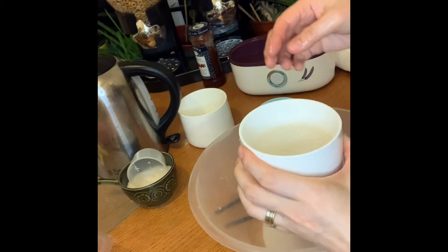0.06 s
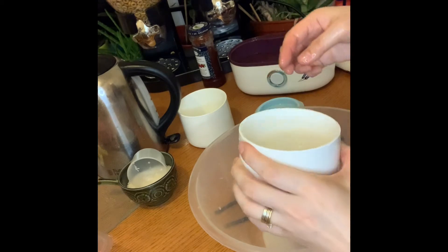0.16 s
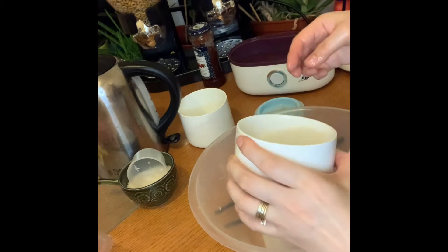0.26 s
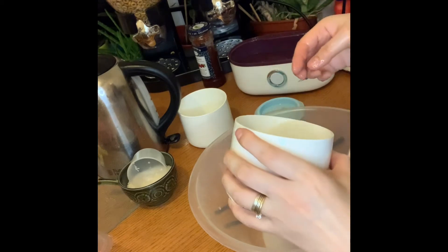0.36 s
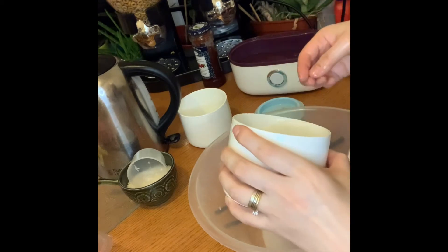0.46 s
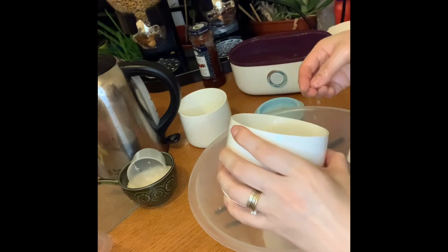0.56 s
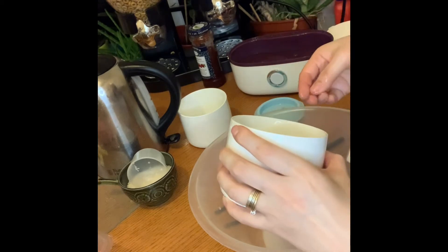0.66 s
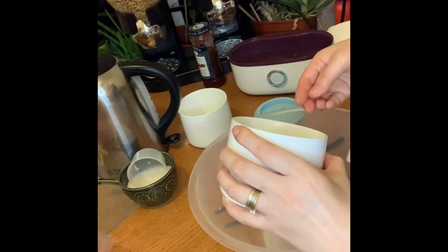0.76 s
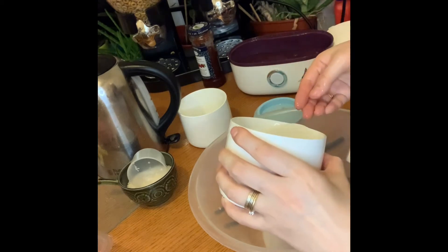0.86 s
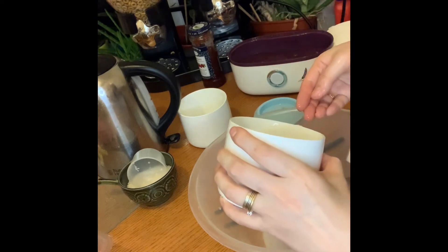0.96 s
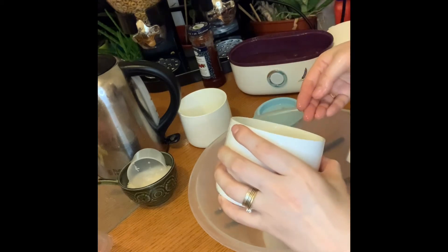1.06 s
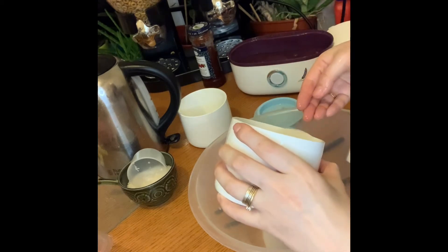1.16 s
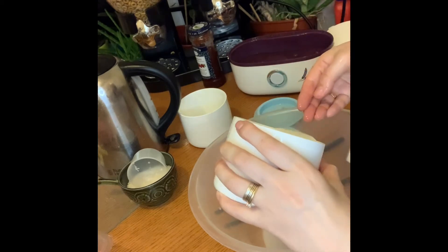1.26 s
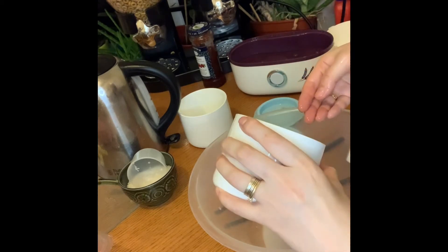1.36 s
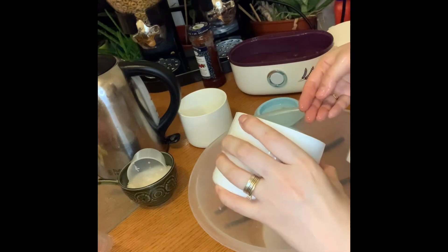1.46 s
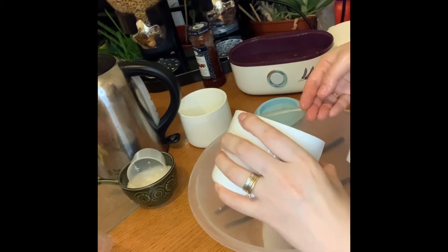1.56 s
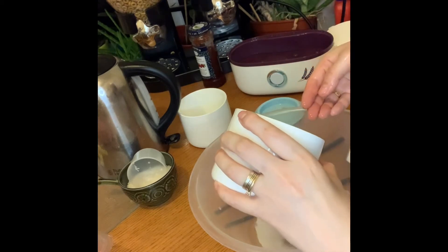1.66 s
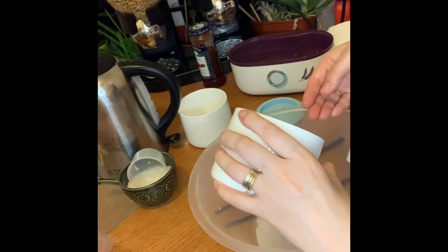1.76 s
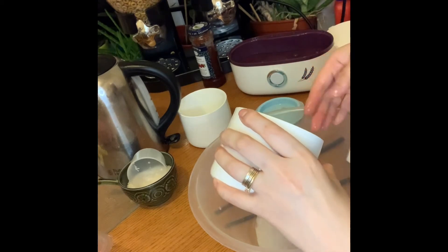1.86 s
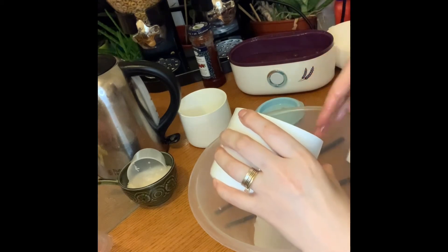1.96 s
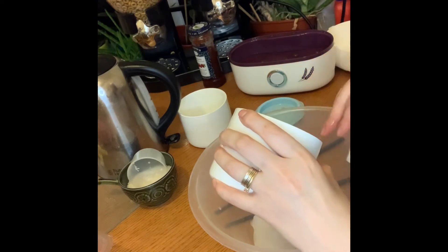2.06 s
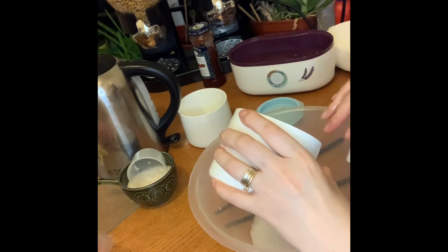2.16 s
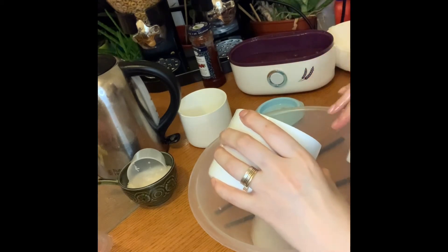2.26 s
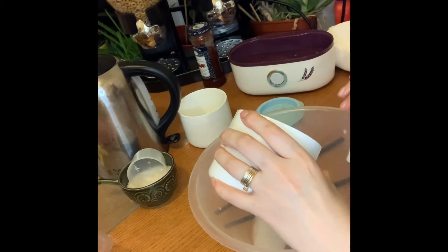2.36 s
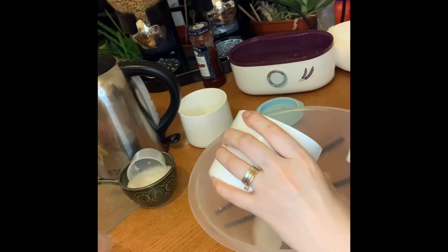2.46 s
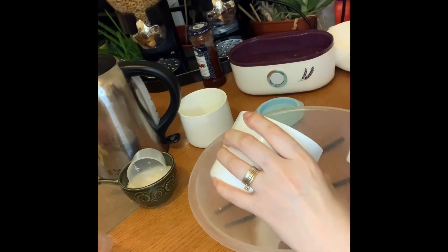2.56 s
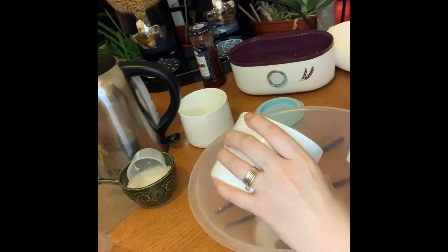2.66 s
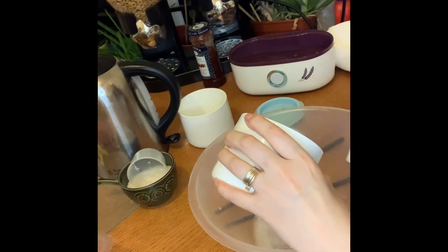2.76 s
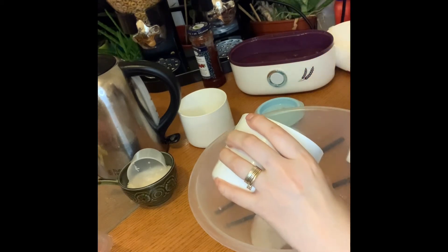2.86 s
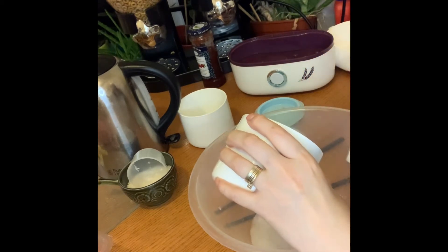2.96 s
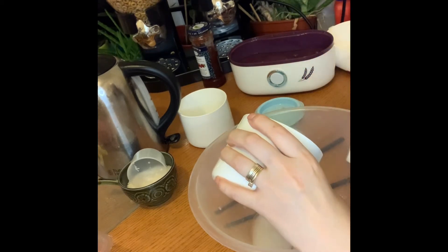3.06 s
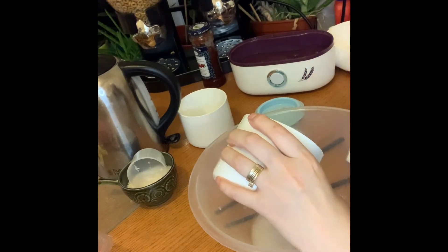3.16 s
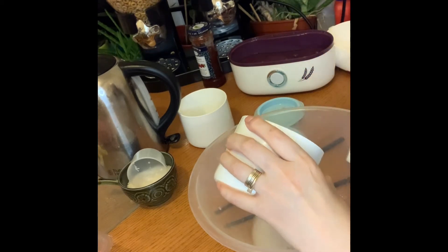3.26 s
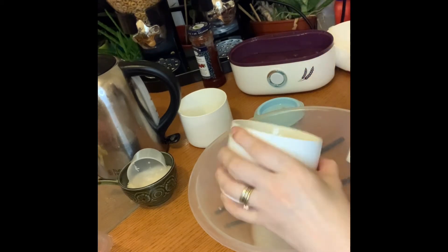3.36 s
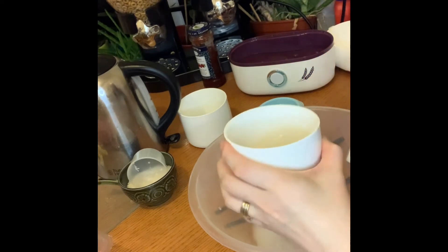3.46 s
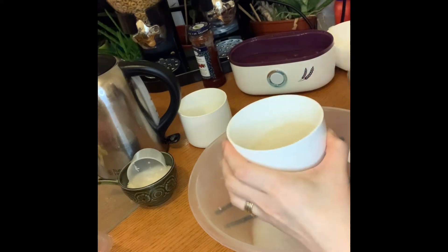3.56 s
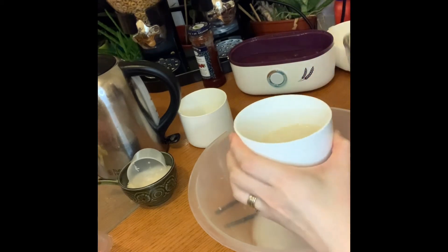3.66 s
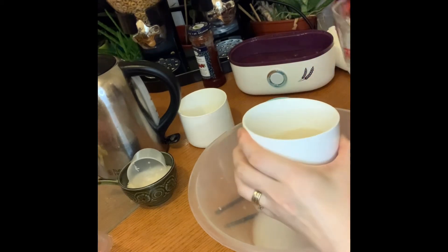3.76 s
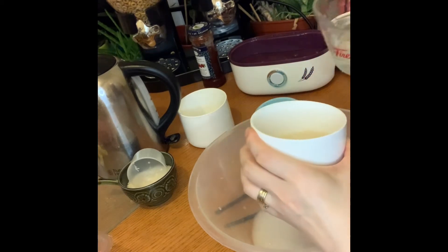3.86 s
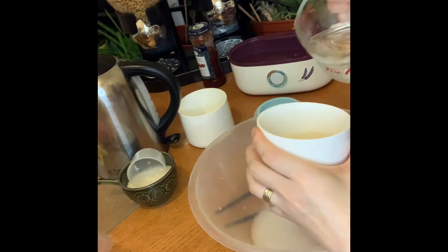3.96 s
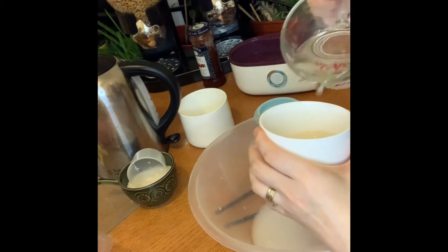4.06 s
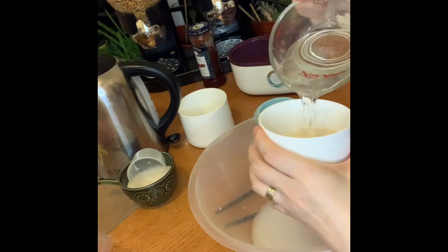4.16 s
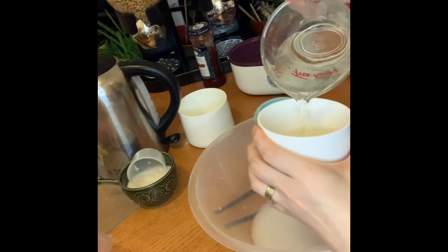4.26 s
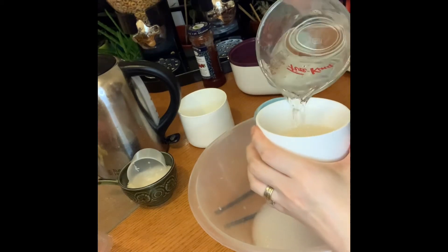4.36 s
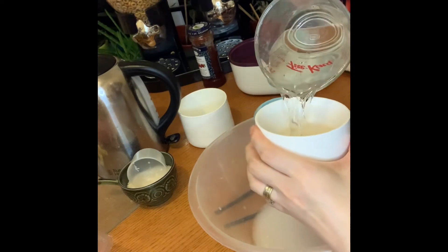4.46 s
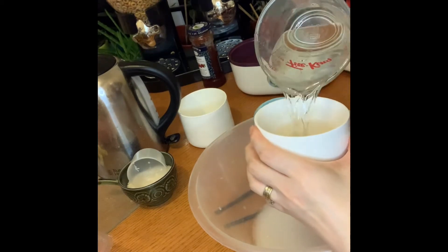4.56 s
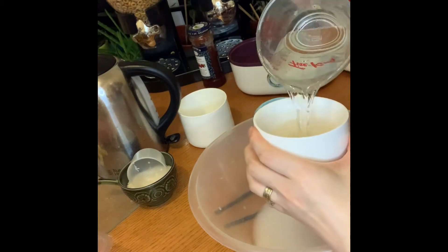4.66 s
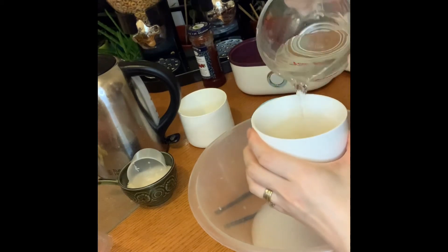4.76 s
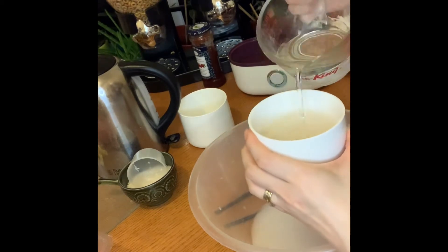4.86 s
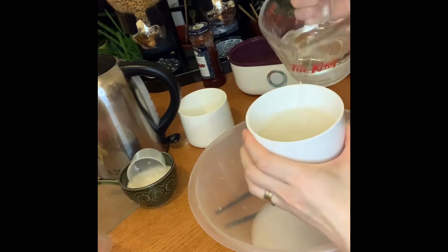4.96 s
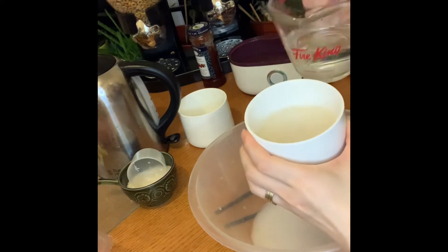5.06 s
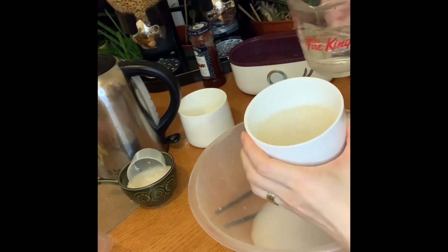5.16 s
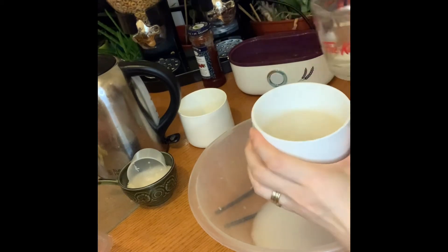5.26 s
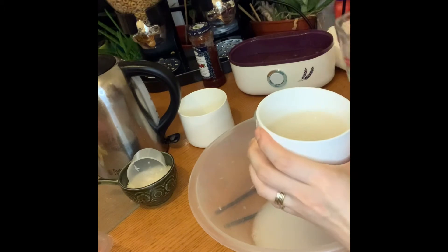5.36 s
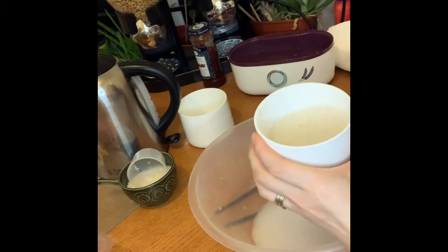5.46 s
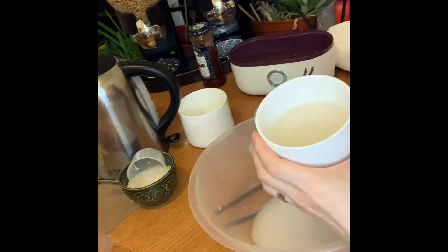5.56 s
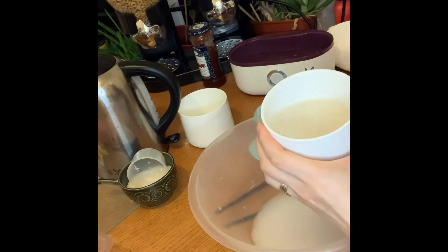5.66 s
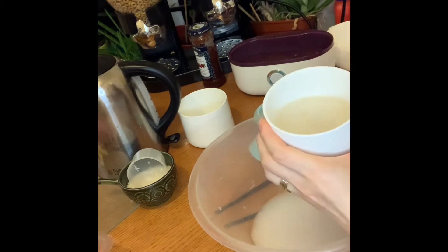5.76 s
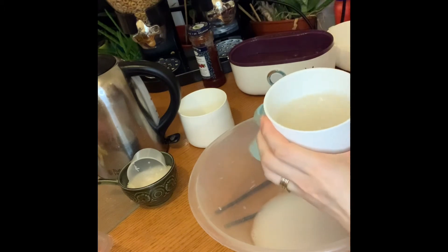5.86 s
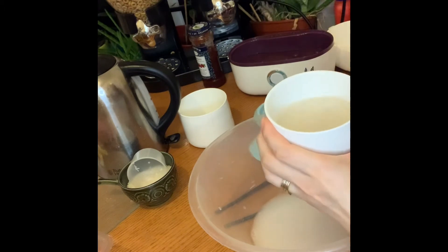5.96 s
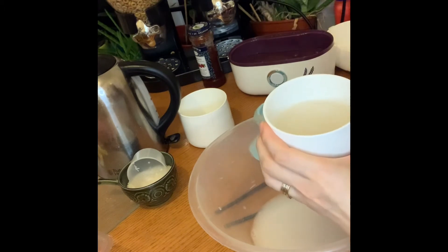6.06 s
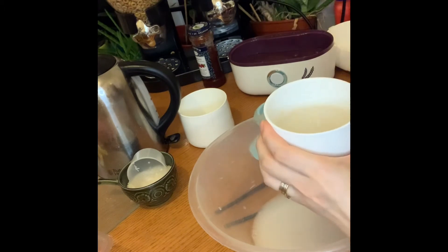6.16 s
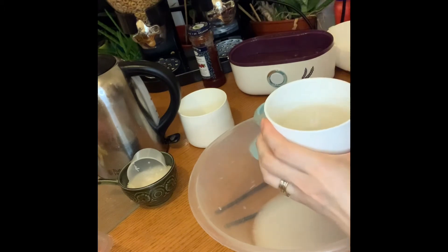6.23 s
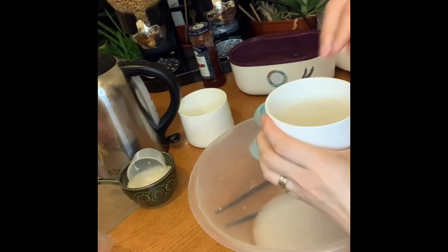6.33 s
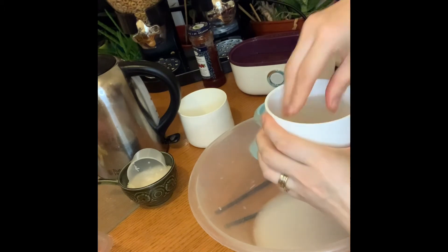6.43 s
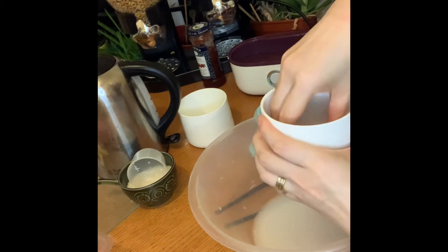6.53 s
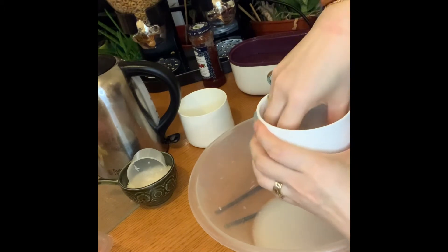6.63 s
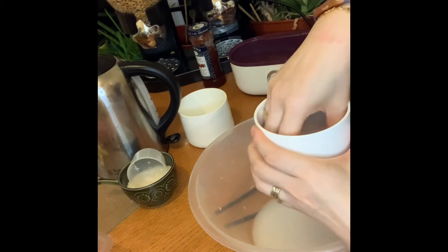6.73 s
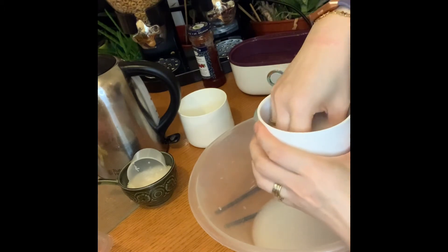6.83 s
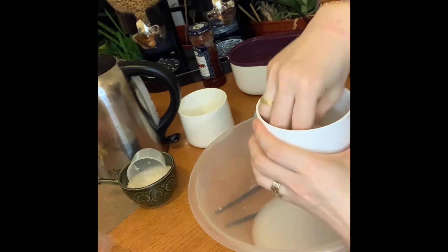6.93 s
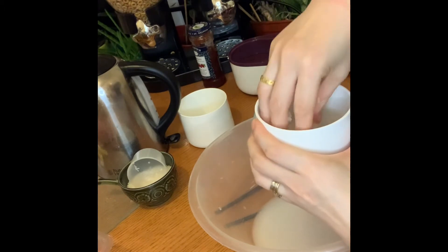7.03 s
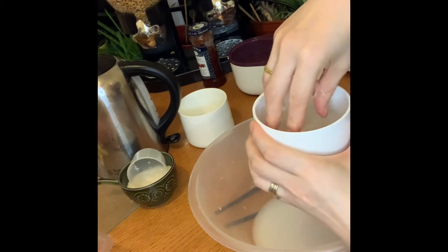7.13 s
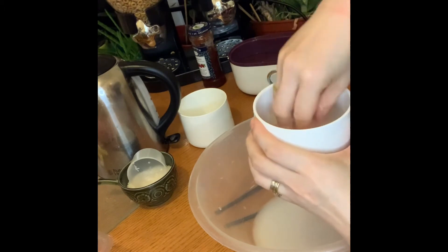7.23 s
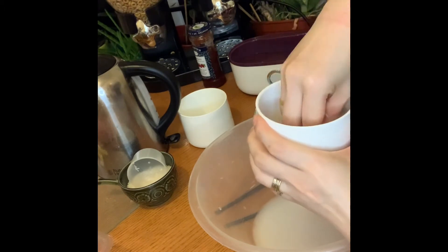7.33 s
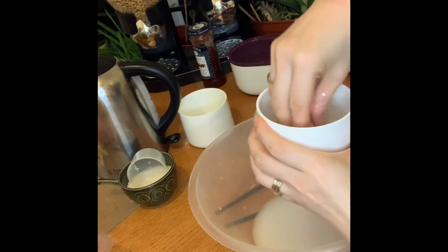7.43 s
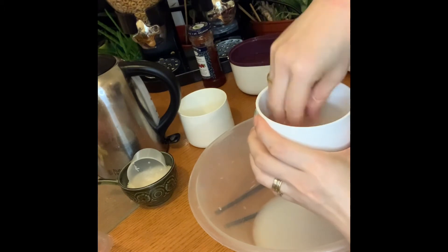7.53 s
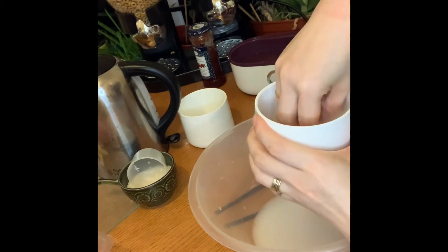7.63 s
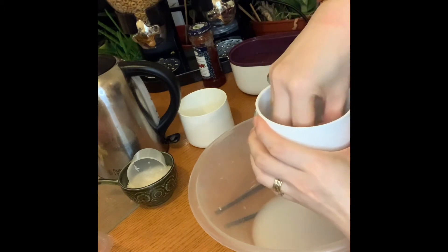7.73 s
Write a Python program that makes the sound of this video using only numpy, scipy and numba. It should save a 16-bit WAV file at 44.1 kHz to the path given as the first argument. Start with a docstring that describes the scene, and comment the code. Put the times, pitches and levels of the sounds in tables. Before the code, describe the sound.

Close up, water runs unevenly out of a ceramic pot of rice and patters into a plastic bowl with small gurgles and splashes. After a brief lull, a glass jug splashes a little water into the pot, then lands on the wooden table with a sharp knock, the loudest sound, followed by smaller taps. Quiet sloshing follows as a hand stirs the rice. A low fridge hum sits underneath in the small kitchen.

```python
"""Rinse water runs from a ceramic pot into a plastic bowl: bubbles chirp, spray crackles, the bowl rings.
A glass jug refills the pot and is set down hard, ringing a wooden table; then fingers stir the rice.
A fridge hums in the small kitchen. A phone with two microphone ports stands close by:
left lags right, the treble is nearly the same in both."""
import sys
import numpy as np
from scipy import signal
from scipy.fft import rfft, irfft, next_fast_len
from scipy.io import wavfile
from scipy.ndimage import uniform_filter1d, minimum_filter1d
from numba import njit

SR = 44100
rng = np.random.default_rng(int(sys.argv[2]) if len(sys.argv) > 2 else 0)


def to_wav(s):
    """Save 16-bit WAV."""
    ch = np.atleast_2d(s).T  # columns
    pcm = np.round(np.clip(ch, -1, 1) * 32767)  # PCM
    wavfile.write(sys.argv[1], SR, pcm.astype(np.int16))


N = 343539

# compressor hum (time [s], level [dB])
HUM = [(0.0, -47.5), (1.82, -47), (5.68, -48), (5.88, -46.5), (6.25, -48.5), (7.01, -48), (7.79, -49)]
# faint fridge tones (multiple of rotor speed, level [dB])
HUM_OVERTONES = [(4, -85), (10.2, -93), (17, -97)]
# steady bass-heavy background noise, its hiss cut off above about 14 kHz (frequency [Hz], gain [dB])
BACKGROUND_SPECTRUM = [(30, 6.5), (70, 9), (130, -0.5), (250, -6), (500, -18.5), (1000, -25.5), (2000, -27),
                       (4000, -28), (8000, -31.5), (12500, -33), (14500, -64)]
# glass on wood (time [s], blow [dB], contact [ms], thud [dB], ring time left under the hand [ratio])
KNOCKS = [(0.001, -72.5, 0.79, -72, 0.95), (0.945, -46.5, 3.26, -66, 0.91), (5.495, -17, 0.74, -15, 1),
          (5.592, -41, 0.7, -34.5, 1), (5.815, -38, 1.17, -42, 0.64), (5.833, -26, 3.9, -54, 0.4),
          (5.964, -75, 0.35, -60, 0.45)]
# table top (frequency [Hz], gain [dB], T60 [s])
TABLE_MODES = [(140.9, 0, 0.22), (192, -8, 0.36), (256.5, 1, .13), (298.7, -6, 0.2), (358.9, -0.5, .2),
               (410, 1.5, 0.11), (447, -4, 0.17), (508, -6.5, 0.18), (596.3, -0.5, .1), (615, 4, 0.13),
               (713.5, 2, 0.11), (815, -1, 0.09), (899, -1, .14), (1160, 1.5, 0.18), (1200, -3.5, .1),
               (1303, -1.5, 0.1), (1642, -5, 0.092), (1976, -2.5, 0.073), (3297, -14.5, 0.2)]
# dense wood response between the modes (frequency [Hz], gain [dB])
THUD_SPECTRUM = [(90, -40), (260, 1.5), (400, 2.5), (650, 0), (1000, -7), (2000, -12.5), (4000, -18.5),
                 (9000, -29.5), (15000, -30.5)]
# pot moved or rice stirred (crest time [s], level [dB], treble share [dB], hold [s])
SLOPS = [(0.02, -96, -11, 0.018), (0.116, -84, 1.5, 0.0062), (1.116, -82.5, -1.5, 0.0077),
         (4.102, -75.5, 12.5, 0.0025), (5.111, -81, -7, .35), (6.12, -81, -3.5, 0.0062),
         (6.337, -86.5, 13, 0.012), (6.614, -65, -4.5, 0.052), (6.788, -83, 3, 0.018),
         (6.861, -89, 10, 0.07), (7.089, -76.5, 4, 0.017), (7.426, -83, 8, 0.0022), (7.566, -97, 27, 0.013),
         (7.78, -84, 6, 0.011)]
# one list a pour: pot to bowl, jug to pot (time [s], flow [dB], treble share [dB])
POURS = [
    [(1.222, -57.5, -30), (1.235, -74.5, -41), (1.29, -64.5, -4.5), (1.37, -63, 1), (1.43, -71.5, -2),
     (1.47, -59, -18), (1.51, -61, 1), (1.62, -60, -6.5), (1.66, -56.5, -7), (1.76, -51, -20),
     (1.84, -61.5, -2.5), (1.9, -63.5, -1.5), (1.95, -56.5, 0), (2.17, -58, -4.5), (2.19, -59, 3),
     (2.27, -62.5, -4), (2.33, -58, -9.5), (2.45, -70, -6), (2.6, -61, -10.5), (2.73, -64, -1),
     (2.8, -67, -5.5), (2.83, -61.5, -1.5), (2.88, -56.5, -0.5), (3.17, -60.5, -4), (3.19, -58.5, 6),
     (3.33, -66.5, -8), (3.5, -89.5, 7), (3.65, -100, 13.5)],
    [(4.24, -109, 20), (4.29, -84, 5.5), (4.55, -81, 3.5), (4.6, -78.5, 7.5), (4.74, -70.5, -6.5),
     (4.76, -66, -5), (4.82, -69.5, 2.5), (4.95, -104, 10)],
]
# hollow of the pot (frequency [Hz], gain [dB])
POT_CAVITY = [(900, -21), (1150, -8), (1320, 1.5), (1500, -1), (1680, 1.5), (1950, -2), (2150, -5),
              (2450, -0.5), (2750, -1), (3050, 1), (3500, 4.5), (3900, -0.5), (6000, -3.5)]
# plastic bowl (frequency [Hz], gain [dB], T60 [s])
BOWL_MODES = [(189, -5, 0.03), (286, -3, 0.045), (399, -4, 0.026), (514, 2.5, 0.046), (567, 7, 0.022),
              (686, 6, 0.0066)]
# single bubbles (time [s], level [dB], pitch [Hz])
BUBBLES = [(1.231, -45, 523), (1.285, -51, 388), (1.321, -42.5, 1570), (1.449, -41, 2240),
           (1.448, -40, 2750), (1.506, -47.5, 464), (1.507, -43, 1115), (1.529, -38, 1570),
           (1.543, -33.5, 1940), (1.646, -56, 538), (1.673, -40.5, 550), (1.696, -32, 550),
           (1.725, -34.5, 542), (1.736, -53, 544), (1.759, -30.5, 544), (1.802, -39, 540),
           (1.915, -43, 1730), (1.939, -48, 533), (1.948, -52, 1415), (1.962, -47, 564), (1.985, -48, 546),
           (2.01, -47, 533), (2.052, -55, 520), (2.076, -31, 3980), (2.076, -42, 1430), (2.077, -46.5, 570),
           (2.106, -40, 1730), (2.149, -39, 1460), (2.172, -66, 563), (2.187, -31.5, 1420),
           (2.205, -47, 555), (2.223, -41, 2610), (2.225, -48, 553), (2.223, -36.5, 1820),
           (2.304, -40, 1455), (2.309, -48, 550), (2.34, -38.5, 537), (2.455, -47, 546), (2.507, -49, 511),
           (2.59, -48, 1310), (2.68, -47, 510), (2.705, -50, 547), (2.727, -43, 1710), (2.81, -35.5, 1630),
           (2.88, -50.5, 520), (2.88, -37.5, 1820), (2.88, -38, 1290), (2.881, -24.5, 3830),
           (2.918, -36, 1464), (2.943, -30.5, 3530), (3.082, -43, 1580), (3.116, -50.5, 510),
           (3.14, -47.5, 3020), (3.186, -41, 2470), (3.209, -36, 2335), (3.212, -50, 517),
           (3.31, -35.5, 1745), (4.099, -45.5, 3500), (4.099, -57.5, 1305), (4.273, -61, 2670),
           (4.312, -56, 2800), (4.36, -55, 2720), (4.439, -60, 2830), (4.521, -52, 2640), (4.56, -53, 1700),
           (4.578, -48, 1620), (4.607, -53, 1380), (4.633, -53, 1360), (4.635, -50, 2810),
           (4.661, -56, 1580), (4.68, -57, 1250), (4.706, -57, 2680), (4.761, -44, 2760),
           (4.759, -35, 1275), (4.762, -46, 2100), (4.779, -42, 1220), (4.81, -53, 1230),
           (4.839, -58, 1230), (6.322, -57.5, 1596), (6.574, -60.5, 2300), (6.605, -49, 2590),
           (6.626, -51.5, 1380), (6.658, -53, 1340), (6.666, -46.5, 3500), (6.7, -61, 1370),
           (6.738, -48, 3520), (6.801, -62, 2770), (6.83, -64, 2700), (6.864, -68, 1480), (6.9, -62, 2750),
           (6.959, -62, 2500), (7.066, -60.5, 2510), (7.082, -53.5, 2350), (7.085, -74, 1450),
           (7.1, -55, 3160), (7.384, -63, 3130), (7.41, -65, 1490), (7.494, -74, 1590), (7.528, -67, 1580),
           (7.564, -66.5, 1520)]
# single splats (time [s], level [dB], pitch [Hz])
SPLATS = [(1.245, -49, 9500), (1.283, -39.5, 8700), (1.484, -50, 8100), (1.572, -45.5, 8450),
          (1.762, -44.5, 7040), (1.805, -38.5, 11800), (1.832, -32, 13100), (1.948, -49, 6550),
          (2.035, -39, 6660), (2.0742, -44, 15400), (2.186, -33.5, 8600), (2.324, -44, 9300),
          (2.391, -44.5, 5400), (2.526, -49, 14400), (2.559, -43, 10100), (2.831, -36.5, 10000),
          (2.973, -39, 9100), (3.0184, -36, 7300), (3.086, -38, 12000), (3.18, -40, 7500),
          (3.2903, -44.5, 10200), (3.7386, -48, 10700), (3.998, -53.5, 8400), (4.077, -48, 15200),
          (4.095, -40, 7200), (4.196, -49.5, 9500), (4.2333, -44.5, 15400), (4.328, -54, 6860),
          (4.475, -56.5, 5800), (4.532, -58, 15000), (4.588, -57, 14700), (4.612, -59, 7760),
          (4.681, -57, 7900), (4.7227, -52, 6500), (4.76, -39, 5270), (4.777, -34.5, 10300),
          (4.807, -34, 10100), (6.3223, -57, 5830), (6.334, -53, 5750), (6.663, -48.5, 6250),
          (6.782, -60, 10200), (6.8623, -73, 7150), (7.0692, -56.5, 8050), (7.3051, -62.5, 8050),
          (7.385, -54, 8610), (7.4043, -53, 7850), (7.581, -56, 6820)]
# kitchen decay (frequency [Hz], T60 [s])
ROOM_T60 = [(100, 0.64), (300, 0.28), (1000, 0.32), (3000, 0.11), (10000, 0.056)]
# port difference: near sound leaning right, echoes, background (frequency [Hz], gain [dB])
NEAR_LEAN = [(100, -40), (300, -17), (600, -9), (1200, -19.5), (2400, -15.5), (4500, -47.5)]
ECHO_WIDTH = [(40, -27.5), (130, -27.5), (300, -10.5), (600, -4), (1200, 0), (2400, 2.5), (4500, -27),
              (7000, -17.5), (9500, -27), (15000, -8.5)]
BACKGROUND_WIDTH = [(40, -30.5), (130, -15.5), (300, -3.5), (600, 11.5), (1200, 6), (2400, -9),
                    (4500, -24.5), (7000, -10.5), (9500, -12.5), (15000, -11.5)]


def undb(db):
    return 10 ** (np.asarray(db) / 20)


def unit_rms(x):
    return x / np.sqrt(np.mean(x ** 2))


def wander(span_samples):
    """Smoothed noise, rms 1."""
    return unit_rms(uniform_filter1d(rng.standard_normal(N), span_samples))


def colour(x, points):
    """Filter by (frequency [Hz], gain [dB]) points on a log-frequency axis."""
    hz, db = np.transpose(points)
    size = next_fast_len(len(x) + SR // 10)
    bin_hz = np.maximum(np.arange(size // 2 + 1) * SR / size, 1)
    gain = undb(np.interp(np.log(bin_hz), np.log(hz), db))
    return irfft(rfft(x, size) * gain, size)[:len(x)]


def ring(force, modes):
    """Driven modes; neighbours swing in opposite sense at the listener."""
    out = 0
    for k, (hz, db, t60_s) in enumerate(modes):
        pole = np.exp(2j * np.pi * hz / SR - np.log(1000) / (t60_s * SR))
        out = out + (-1) ** k * undb(db) * signal.lfilter([1], [1, -pole], force).imag
    return out


def fridge(t, rotor_hz=49.37, slots=29):
    """The compressor hums at rotor speed and whines faintly at the slot rate."""
    phase = 2 * np.pi * rotor_hz * t
    waver_db = 2.5 * wander(3000)
    hum = undb(np.interp(t, *np.transpose(HUM))) * np.sin(phase)
    whine = undb(-87.5 + waver_db) * np.sin(slots * phase)
    overtones = sum(undb(db + waver_db[::-1]) * np.sin(k * phase) for k, db in HUM_OVERTONES)
    return np.sqrt(2) * (hum + whine + overtones)


def background(rms_db=-66.5):
    """Steady, bass-heavy noise."""
    return undb(rms_db) * unit_rms(colour(rng.standard_normal(N), BACKGROUND_SPECTRUM))


def knocks(thud_rise_s=0.0019, thud_decay_s=0.038):
    """A half-sine push rings the table top over a noisy thud; longer contact is duller."""
    out, t = np.zeros(N), np.arange(SR) / SR
    envelope = np.exp(-t / thud_decay_s) * np.minimum(t / thud_rise_s, 1)
    for at_s, blow_db, contact_ms, thud_db, ring_share in KNOCKS:
        push = np.sin(np.pi * np.clip(t * 1000 / contact_ms, 0, 1))
        modes = [(hz, db, t60_s * ring_share) for hz, db, t60_s in TABLE_MODES]
        dulled = [(hz, db - 3.5 * contact_ms * np.log2(max(hz / 1000, 1))) for hz, db in THUD_SPECTRUM]
        thud = envelope * unit_rms(colour(rng.standard_normal(SR), dulled))
        start = int(at_s * SR)
        out[start:start + SR] += undb(blow_db) * ring(push / push.sum(), modes) + undb(thud_db) * thud
    return out


def slops(t, rise_db_per_s=309, fall_db_per_s=171):
    """Water in the pot surges, holds and sinks; yields (flow [dB], treble share [dB])."""
    for crest_s, db, treble_db, hold_s in SLOPS:
        before_s, after_s = np.maximum(crest_s - t, 0), np.maximum(t - crest_s - hold_s, 0)
        yield db - rise_db_per_s * before_s - fall_db_per_s * after_s, treble_db


@njit
def chirps(at_s, hz, t60_s, amplitude, glide, swell_s):
    """Damped sines swelling over one cycle plus swell_s; glide > 0: a bubble nearing the surface."""
    out = np.zeros(N)
    for k in range(len(at_s)):
        start, length = int(at_s[k] * SR), int(t60_s[k] * SR) + 2
        cycles, gain = 0., amplitude[k]
        fade = np.exp(-np.log(1000) / length)
        for i in range(min(length, N - start)):
            attack = min(cycles / (1 + swell_s * hz[k]), 1.)
            out[start + i] += gain * attack * np.sin(2 * np.pi * cycles)
            gain *= fade
            cycles += min(hz[k] * (1 + glide * i / length) / SR, .45)
    return out


def swarm(per_s, lo_hz, hi_hz, ring_cycles, scatter_db, glide):
    """Up to 30000 random chirps, a few much louder than the rest; rms 1."""
    when, pitch, life, strength = rng.random((30000, 4))[:int(per_s * N / SR)].T
    hz = lo_hz * (hi_hz / lo_hz) ** pitch
    t60_s = ring_cycles * (.5 + life) / hz
    amplitude = undb(-scatter_db * np.log(1 - strength))
    return unit_rms(chirps(when * N / SR, hz, t60_s, amplitude, glide, 0.))


def fizz(bowl_flow, pot_flows, sputter_db=3.5, sputter_s=0.033):
    """Bubble swarms and spray follow the flow in uneven gouts; the pot colours the bubbles inside it."""
    big = swarm(1800, 1100, 2100, ring_cycles=4.4, scatter_db=2.6, glide=0.37)
    small = swarm(2600, 2300, 5000, ring_cycles=18, scatter_db=2, glide=0.2)
    spray = undb(-11) * swarm(3000, 9500, 12500, ring_cycles=45, scatter_db=1.7, glide=0.0385)
    spray += swarm(4000, 5100, 10500, ring_cycles=61, scatter_db=1.6, glide=0.034)
    spray += undb(-7) * swarm(1500, 12700, 17000, ring_cycles=40, scatter_db=2.1, glide=0.018)
    for layer in (big, small, spray):
        layer *= undb(sputter_db * wander(int(sputter_s * SR)))
    flows = [bowl_flow, *pot_flows]
    in_bowl, *in_pot = [undb(db) * (big + undb(0.5 + 0.53 * treble_db) * small)
                        for db, treble_db in flows]
    spray_gain = sum(undb(db + treble_db) for db, treble_db in flows)
    return in_bowl + colour(sum(in_pot), POT_CAVITY) + spray_gain * spray


def pours(t):
    """Each stream's (flow [dB], treble share [dB])."""
    for pour in POURS:
        at_s, db, treble_db = np.transpose(pour)
        yield np.interp(t, at_s, db, left=-150, right=-150), np.interp(t, at_s, treble_db)


def patter(t, flow_db, drops_per_s=600, smooth_s=0.025, fill_db_per_s=-3):
    """The stream drums on the bowl with the mean flow, less as the bowl fills."""
    drops = np.diff(rng.standard_normal(N + 1) * (rng.random(N + 1) < drops_per_s / SR))
    drum = unit_rms(colour(ring(drops, BOWL_MODES), [(150, 6), (200, 1), (900, -8), (1500, -19)]))
    mean_flow = uniform_filter1d(undb(flow_db), int(smooth_s * SR)) * (flow_db > -90)
    start_s = POURS[0][0][0]
    return undb(-2 + fill_db_per_s * (t - start_s)) * mean_flow * drum


def bubbles(swell_s=0.0015, brood=4, brood_lag_s=0.01, gulp_below_hz=700):
    """Smaller bubbles die sooner; each sheds a weaker brood; low ones gulp and thump the bowl."""
    at_s, db, hz = np.transpose(BUBBLES)
    t60_s = 0.035 * (1000 / hz) ** 0.74
    parents = chirps(at_s, hz, t60_s, undb(db + 2), 0.018, swell_s)
    lag, detune = rng.standard_normal((len(at_s), 2, brood)).transpose(1, 0, 2)
    brood_s = (at_s[:, None] + brood_lag_s * np.abs(lag)).ravel()
    brood_hz = (hz[:, None] * np.exp(0.091 * detune)).ravel()
    broods = chirps(brood_s, brood_hz, 18.5 / brood_hz, np.repeat(undb(db - 10), brood), 0.089, swell_s)
    kicks = np.zeros(N)
    kicks[(at_s * SR).astype(int)] = undb(db - 8) * (hz < gulp_below_hz)
    return parents + broods + ring(kicks, BOWL_MODES[:3])


def splats(droplets=40, mean_lag_s=0.008):
    """A dry contact click and a falling ping throw a cloud of droplets around their pitch."""
    at_s, db, hz = np.transpose(SPLATS)
    shape = (len(at_s), droplets)
    cloud_s = (at_s[:, None] + rng.exponential(mean_lag_s, shape)).ravel()
    cloud_hz = np.clip(hz[:, None] * np.exp(0.18 * rng.standard_normal(shape)), 3000, 16000).ravel()
    cloud = chirps(cloud_s, cloud_hz, 30 / cloud_hz, np.repeat(undb(db - 10.5), droplets), 0.032, 0.)
    tick = chirps(at_s, 1.4 * hz, 4 / hz, undb(db - 8), 0., 0.)
    ping = chirps(at_s, hz, 12 / hz, undb(db + 9.5), -0.17, 0.)
    impulses = np.zeros(N)
    impulses[(at_s * SR).astype(int)] = undb(db + 5.5)
    click = colour(impulses, [(700, -4.5), (2500, -7), (12000, 3.5)])
    return click + tick + ping + cloud


def room_tails(rise_s=0.000056):
    """Two unrelated echo tails, decaying octave by octave."""
    t = np.arange(SR) / SR
    hz, t60_s = np.transpose(ROOM_T60)
    tails = np.zeros((2, SR))
    for centre_hz in 49.9 * 2. ** np.arange(9):
        edges_hz = [centre_hz / np.sqrt(2), min(centre_hz * np.sqrt(2), .45 * SR)]
        band = signal.butter(2, edges_hz, "band", fs=SR, output="sos")
        band_t60_s = np.interp(np.log(centre_hz), np.log(hz), t60_s)
        fade = np.exp(-np.log(1000) * t / band_t60_s) * np.minimum(t / rise_s, 1)
        tails += signal.sosfilt(band, rng.standard_normal((2, SR))) * fade / np.sqrt(np.sum(fade ** 2))
    return tails


def scene(water_send_db=-6.5, knock_send_db=-4.5, lag_samples=5):
    """Near sound, echoes and background as sum and difference of the ports."""
    t = np.arange(N) / SR
    rinse, refill = pours(t)
    water = fizz(rinse, [refill, *slops(t)]) + patter(t, flow_db=rinse[0]) + bubbles() + splats()
    low_cut = signal.butter(3, 110, "high", fs=SR, output="sos")  # small bodies radiate no deep bass
    water, wood = signal.sosfilt(low_cut, water), signal.sosfilt(low_cut, knocks())
    near = water + wood
    send = undb(water_send_db) * water + undb(knock_send_db) * wood
    echo_mid, echo_side = [signal.fftconvolve(send, tail)[:N] for tail in room_tails()]
    noise_mid, noise_side = background(), background()
    mid = near + echo_mid + noise_mid + fridge(t)
    side = colour(echo_side, ECHO_WIDTH) + colour(noise_side, BACKGROUND_WIDTH) - colour(near, NEAR_LEAN)
    left = np.pad(mid + side, (lag_samples, 0))[:N]
    return np.array([left, mid - side])


def record(dry, ceiling=.52, top_hz=16000):
    """Peak limiter, then low-pass."""
    needed_gain = np.minimum(1, ceiling / (np.abs(dry).max(axis=0) + 1e-9))
    gain = uniform_filter1d(minimum_filter1d(needed_gain, size=401), size=201)
    return signal.sosfilt(signal.ellip(10, .2, 80, top_hz, fs=SR, output="sos"), dry * gain)


dry = scene()
out = record(dry)
to_wav(out)
```